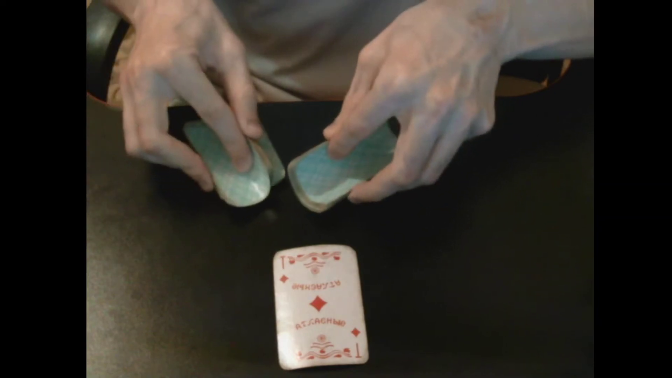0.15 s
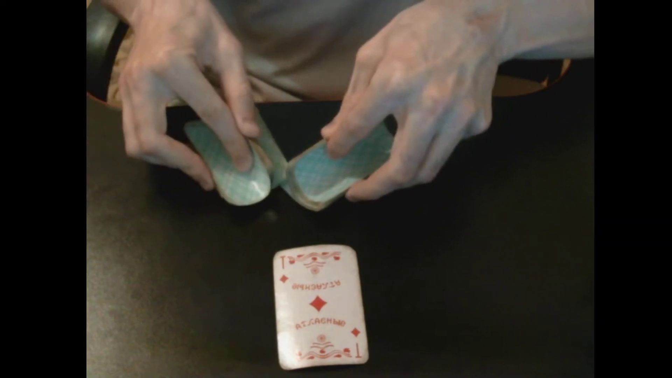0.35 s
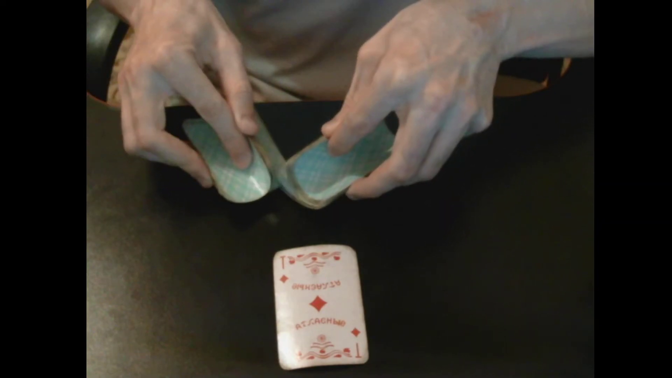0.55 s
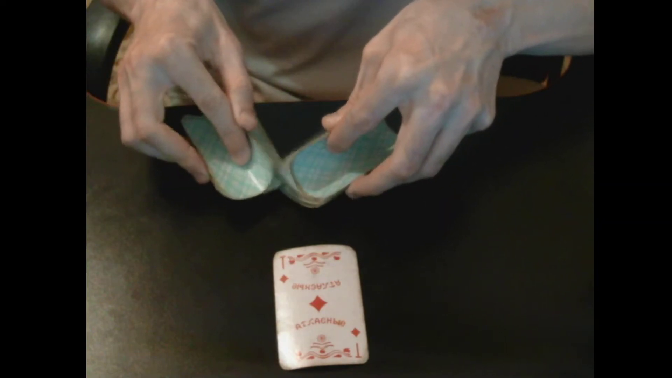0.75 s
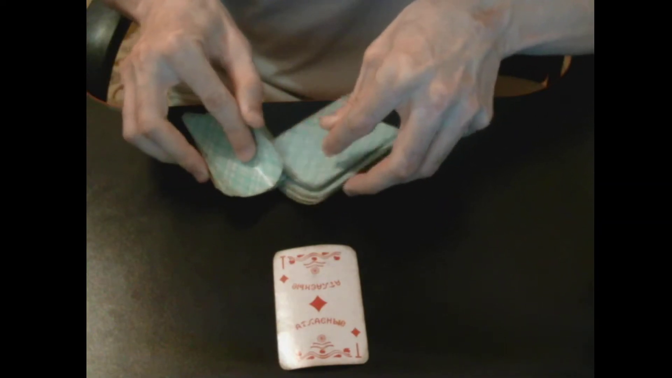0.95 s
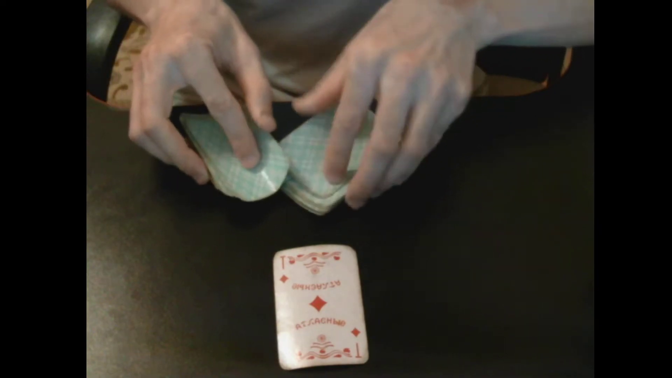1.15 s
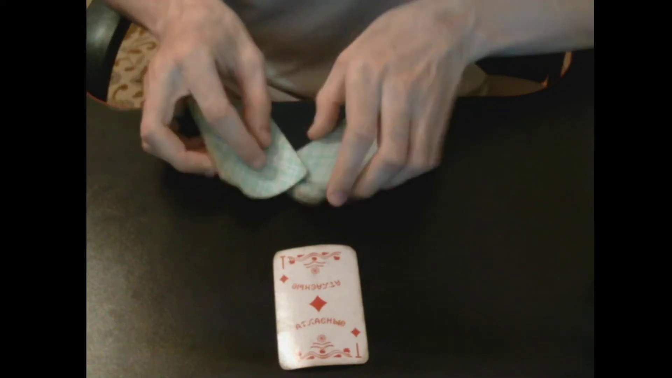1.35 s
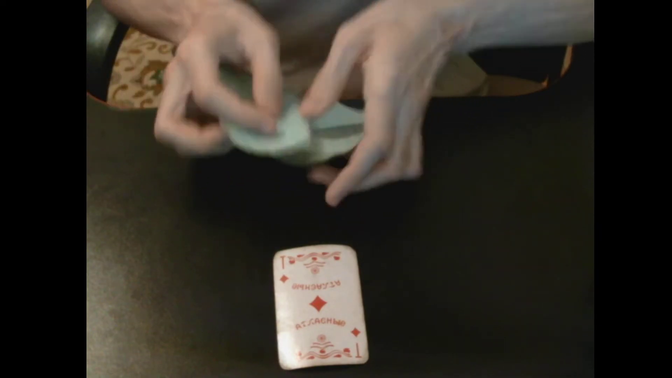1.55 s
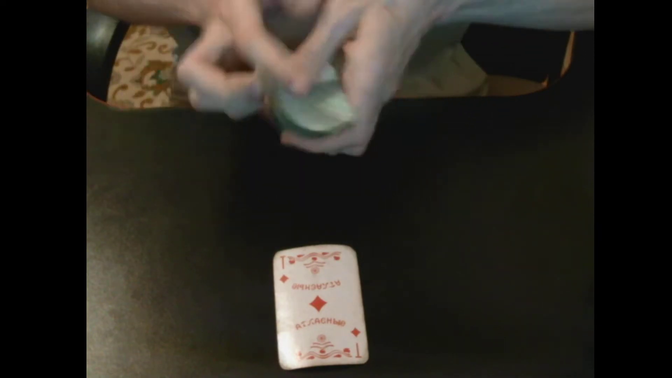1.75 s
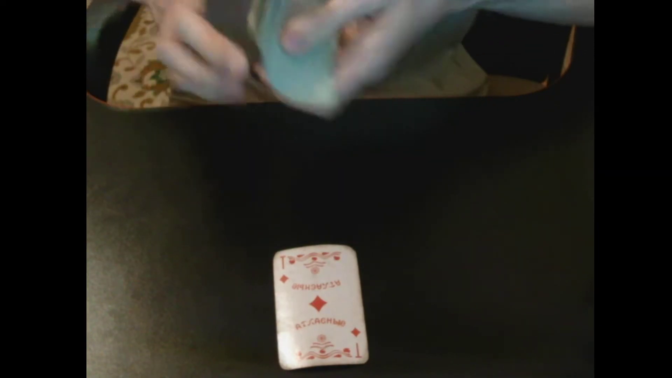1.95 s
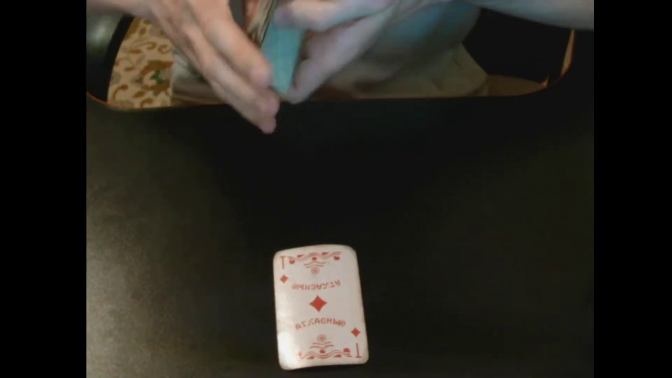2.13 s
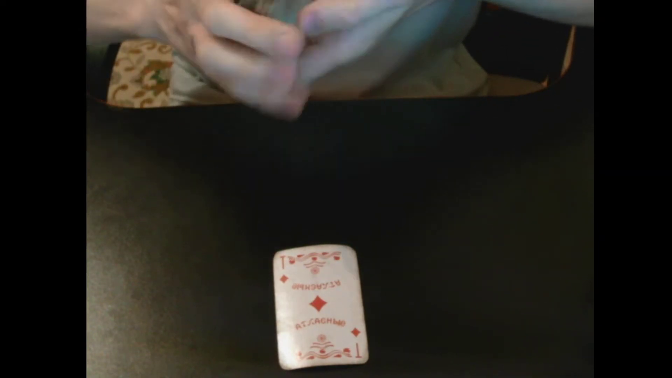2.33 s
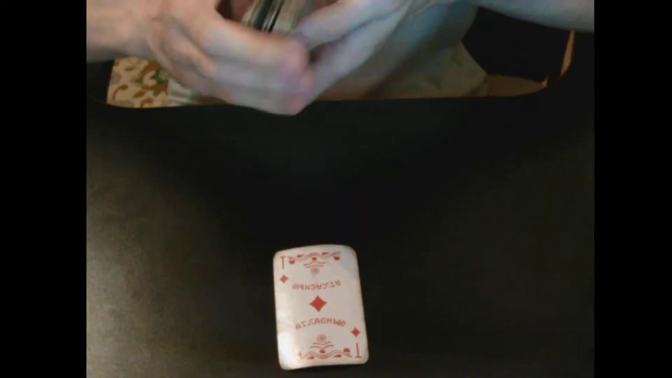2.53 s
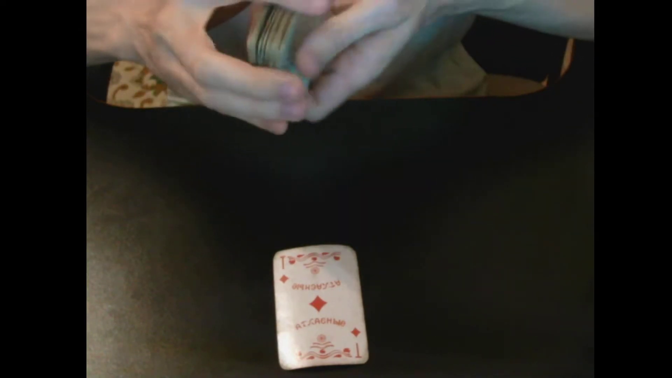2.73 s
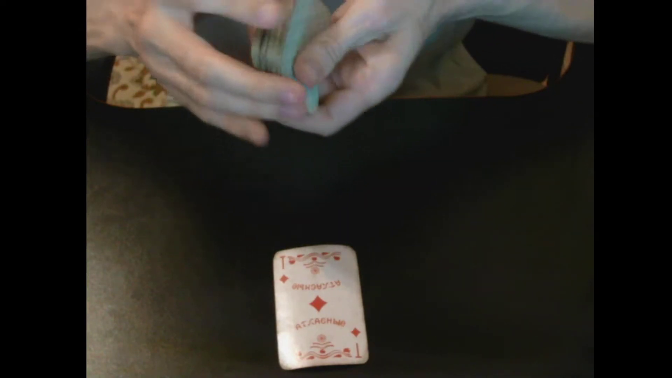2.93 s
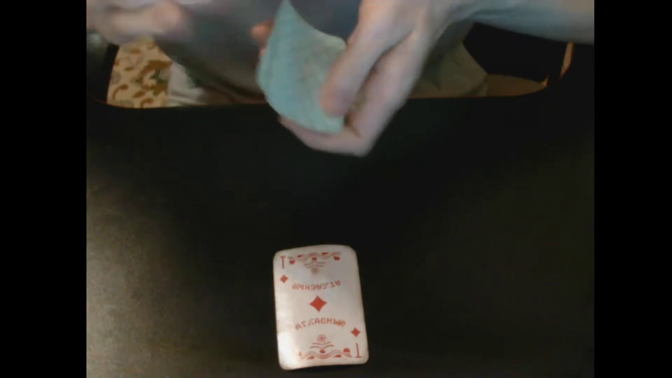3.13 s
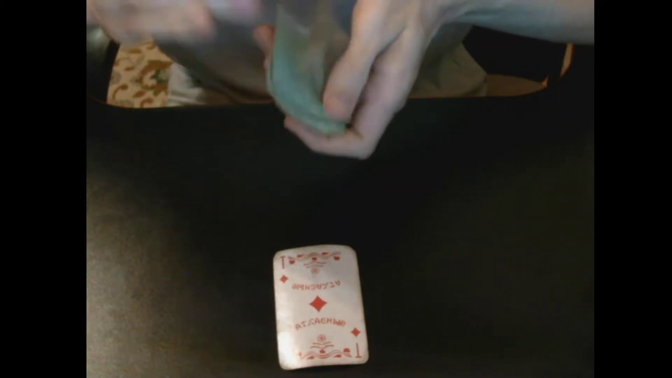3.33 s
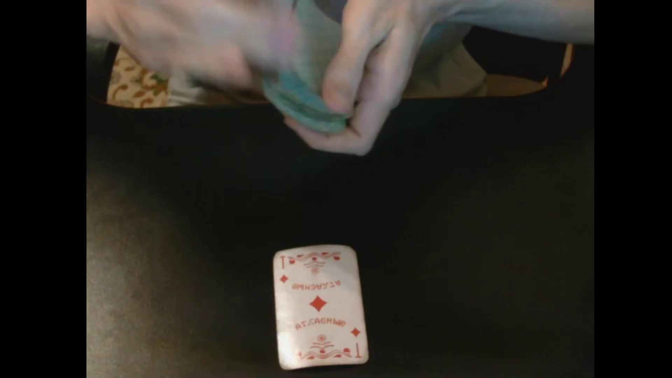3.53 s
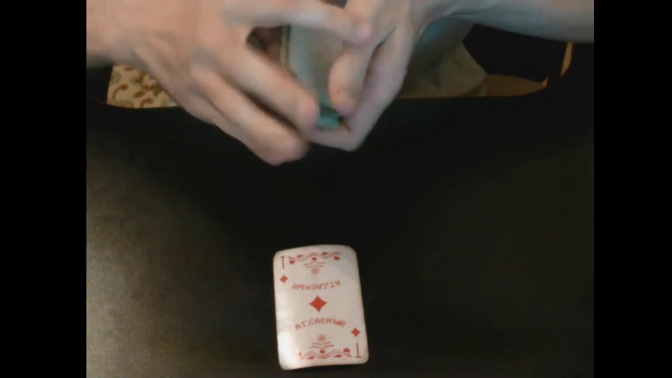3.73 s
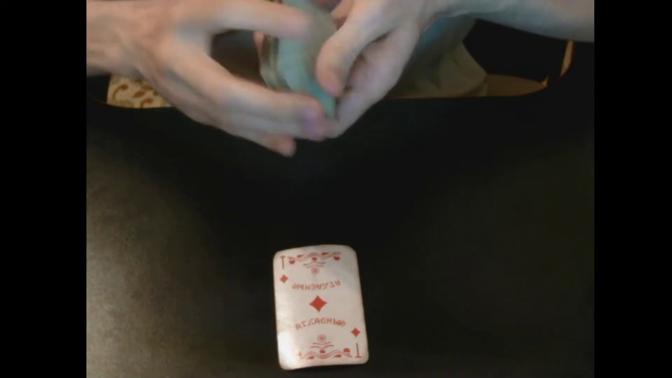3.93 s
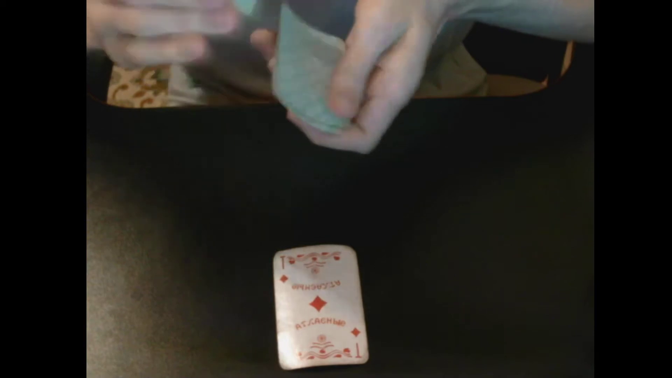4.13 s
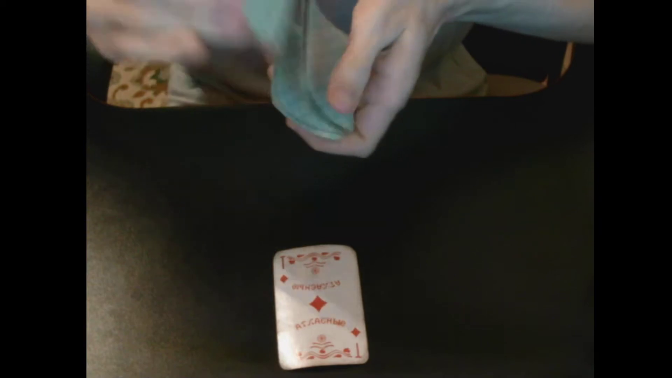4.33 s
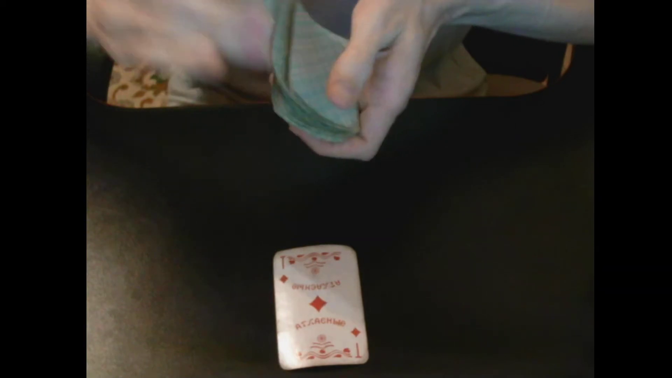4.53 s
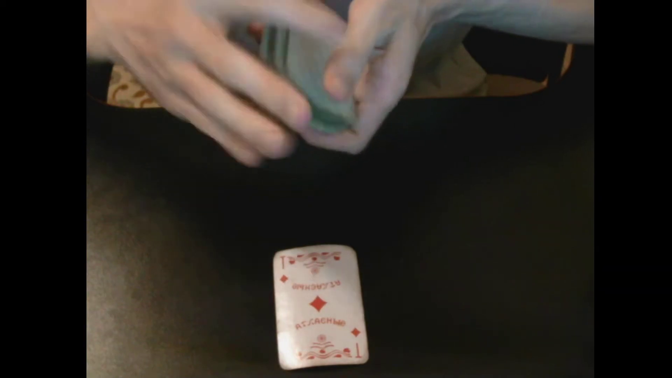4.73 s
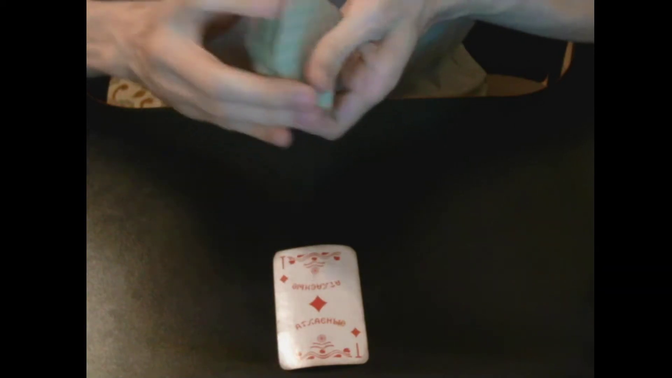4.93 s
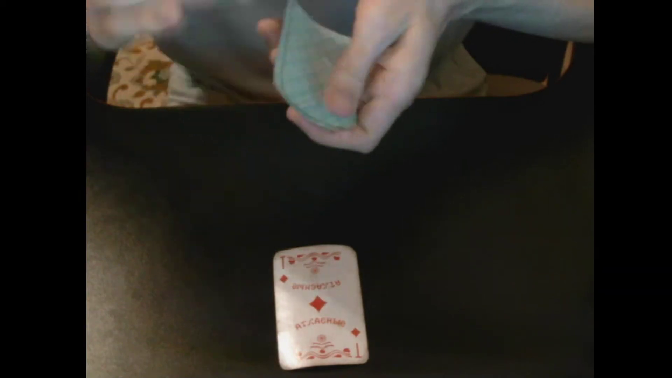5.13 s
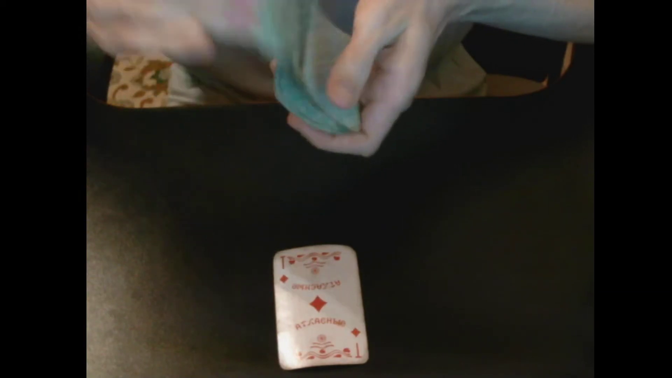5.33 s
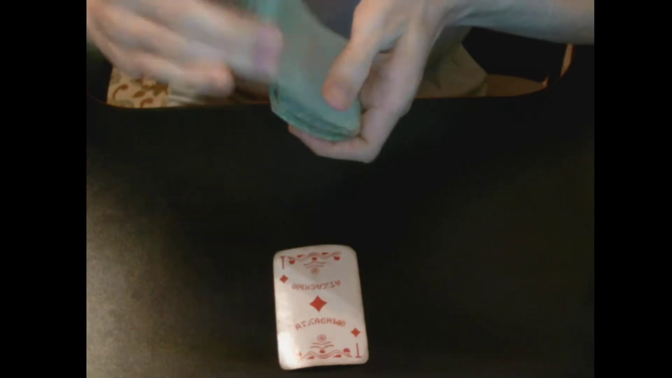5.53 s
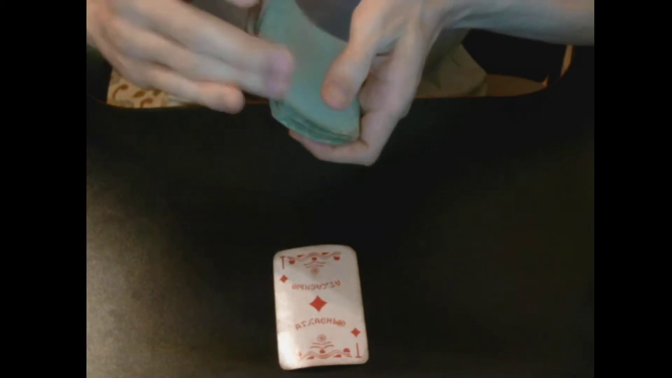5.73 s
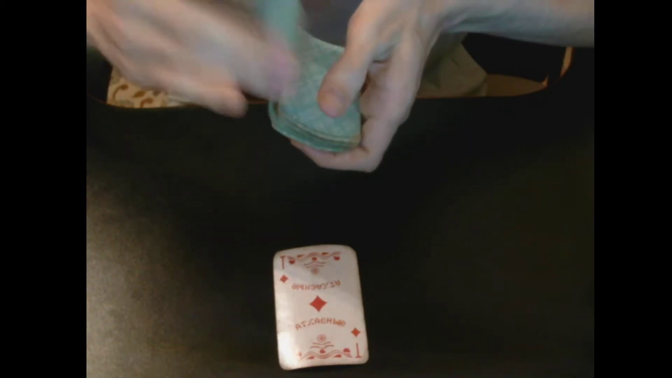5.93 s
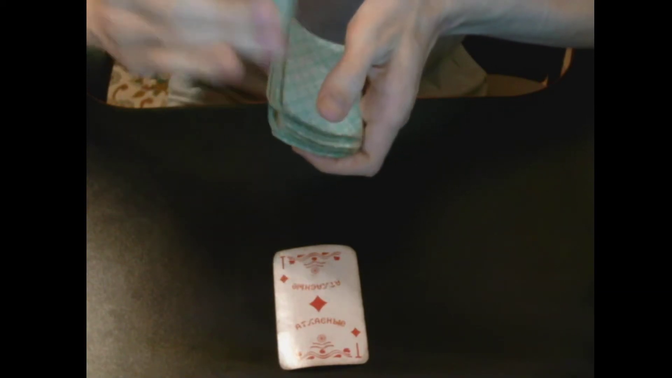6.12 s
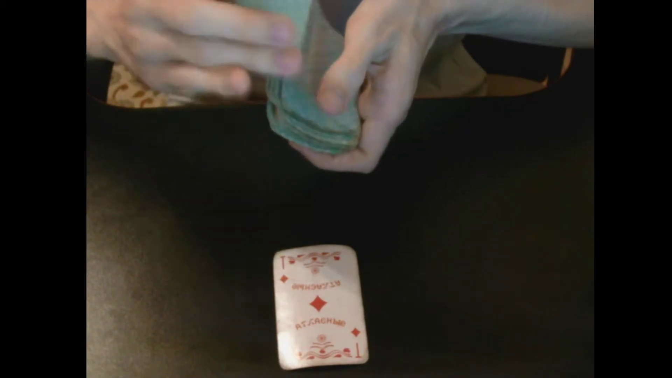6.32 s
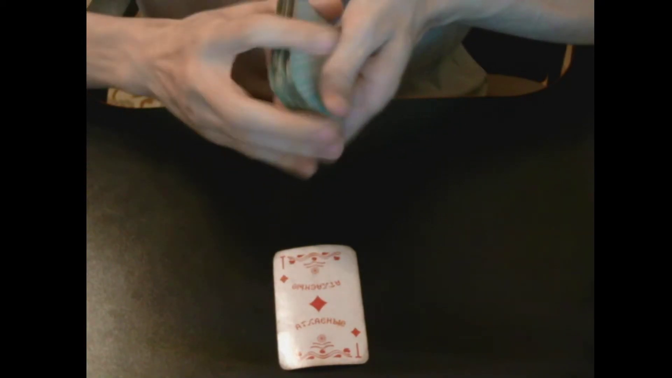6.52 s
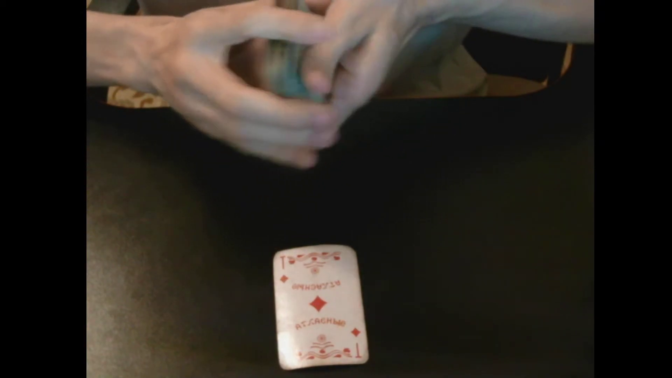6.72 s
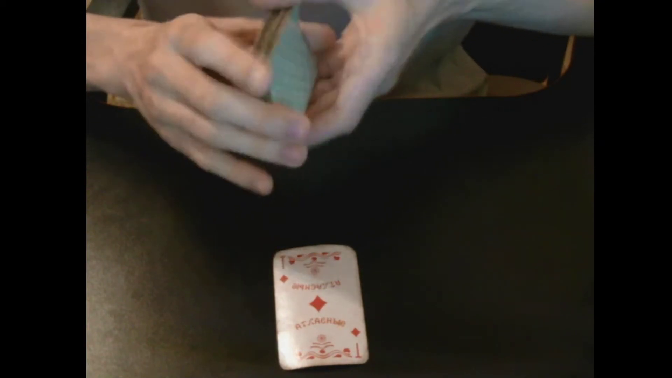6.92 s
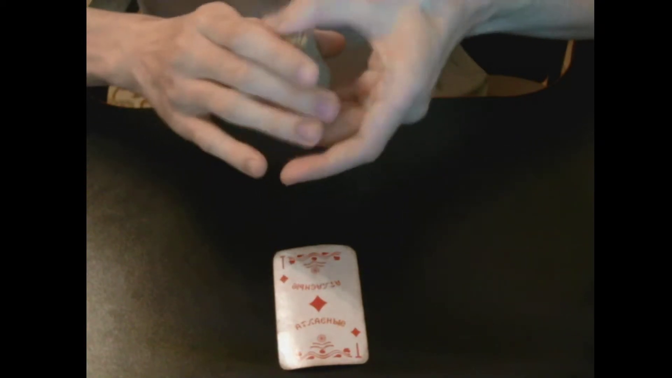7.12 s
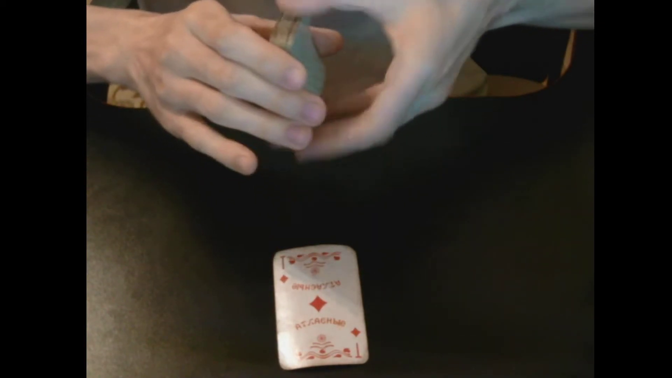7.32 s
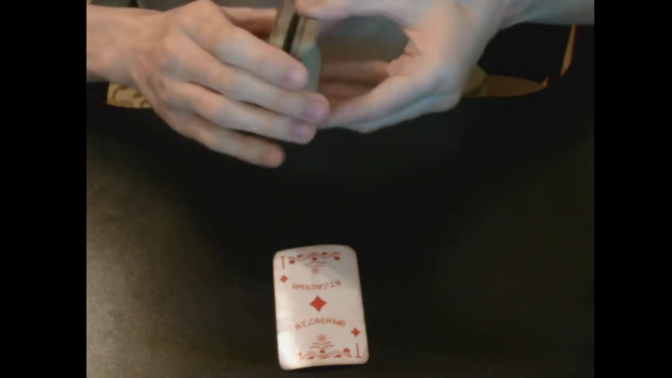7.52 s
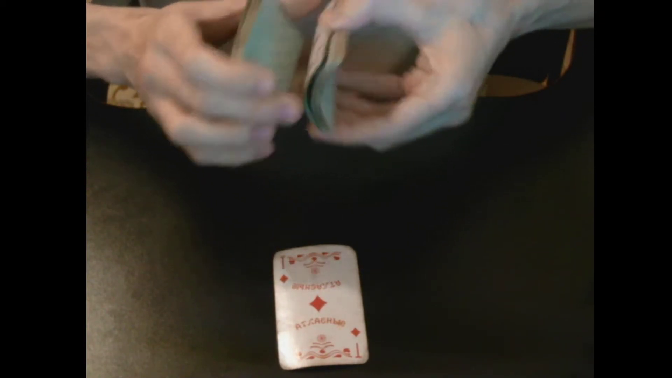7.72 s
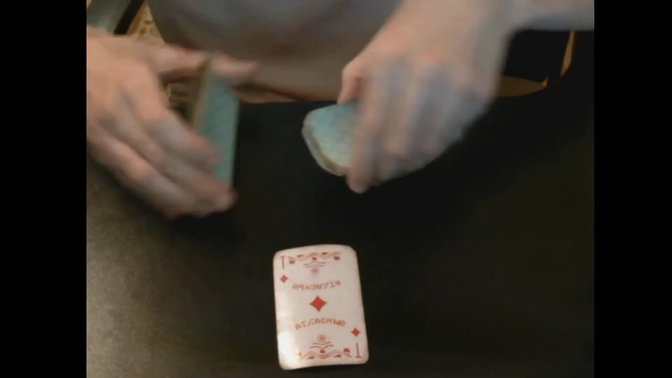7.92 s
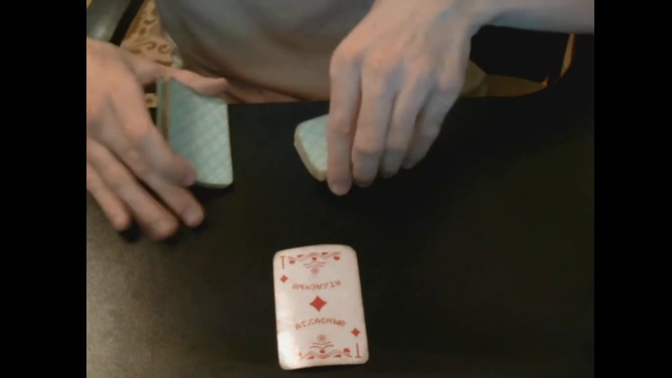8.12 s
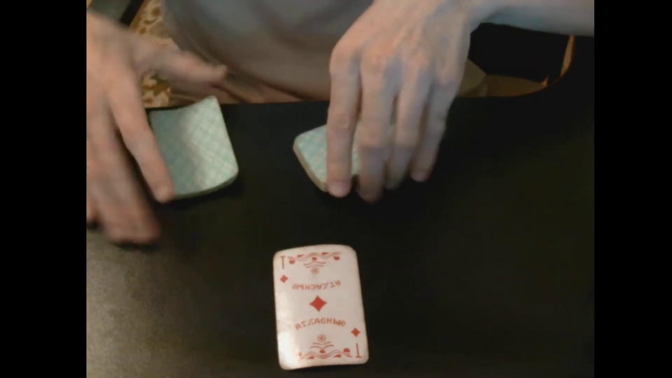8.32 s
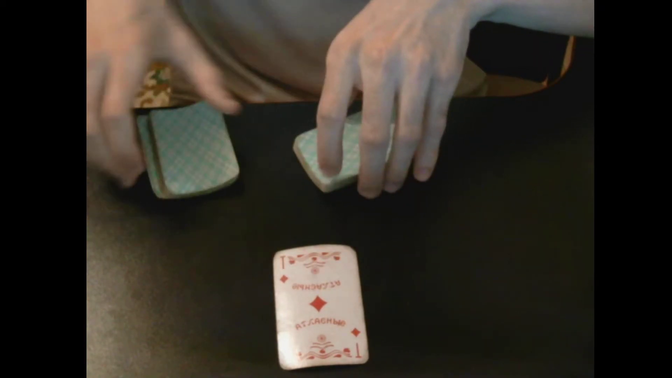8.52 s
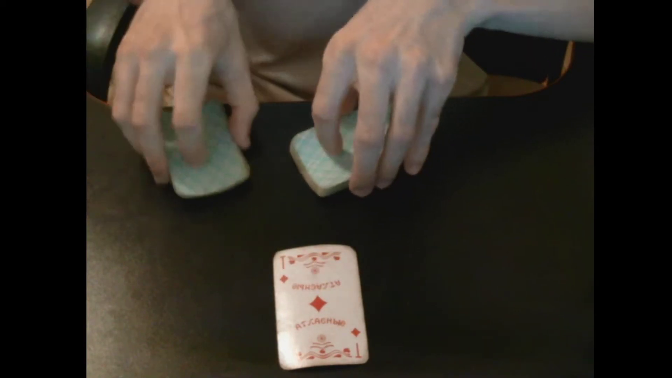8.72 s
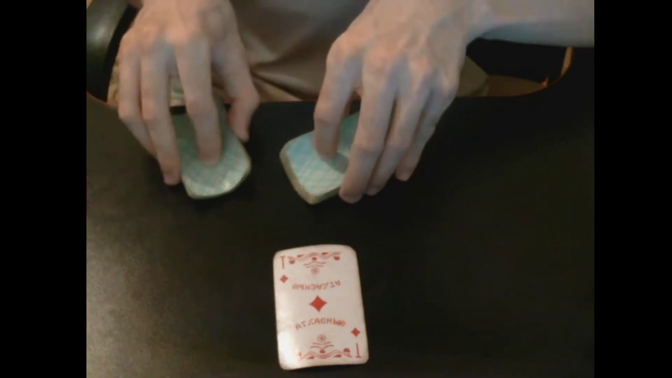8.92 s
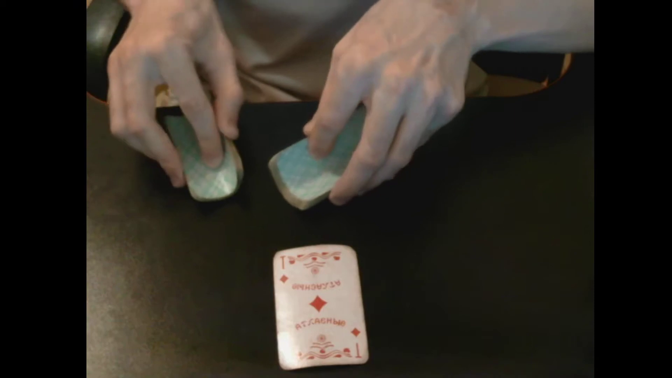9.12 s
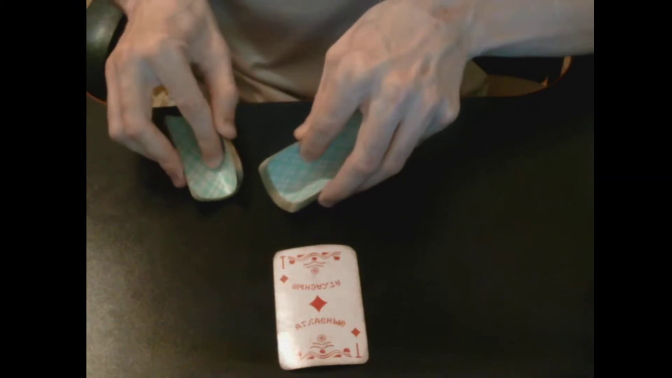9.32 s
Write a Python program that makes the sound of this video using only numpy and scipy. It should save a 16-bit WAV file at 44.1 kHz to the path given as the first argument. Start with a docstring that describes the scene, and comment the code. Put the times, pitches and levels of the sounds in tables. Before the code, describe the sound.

Close by in a small quiet room with low hum and faint hiss, cards are shuffled at a table. From 0.2 to 0.9 s, a riffle gives muffled flicks, dull brushing and soft low thumps, strongest near 0.45 and 0.6, over a deep table sway. From 1.1 to 2.5 s the cards are pushed together in longer, brighter hisses, fullest around 1.4 to 1.6, with tiny thin squeaks near 1.7 to 1.9. After a lull, overhand shuffling runs from about 2.9 to 6.4 s: short, crisp papery swishes, two to four a second, mixed with slaps and snaps, including a puffy slap at 3.2 and the sharpest crack at 3.4. Faint ticks and low rubbing continue to 6.9. Two quiet slides mark the cut near 7.5 to 7.6, then soft thuds and grainy sliding around 7.9 to 8.7 as packets are set down, fading into sparse faint ticks and room tone.

```python
"""Playing cards at a table: a deck is riffled, pushed together, shuffled overhand, cut and set down again.
Faces hiss as grainy, coloured noise; snapping edges and slapping packets are filtered cracks and chatter.
Loose edges tick at random and glossy faces squeak as thin gliding tones.
Fingers and cards thump the table as soft thuds with ringing modes; the table sways deep down as one slow
tone, arms rub as low noise, and a small quiet room adds a short tail, a low hum and hiss."""
import sys
import numpy as np
from scipy import signal
from scipy.fft import rfft, irfft
from scipy.io import wavfile
from scipy.ndimage import uniform_filter1d

SR = 44100
rng = np.random.default_rng(int(sys.argv[2]) if len(sys.argv) > 2 else 0)


def output_pcm(signal):
    """Save a mono or channel-first signal as 16-bit PCM at the path in sys.argv[1].

    Samples are clipped to [-1, 1] before scaling.
    """
    pcm = np.clip(np.atleast_2d(signal).T, -1, 1) * 32767
    wavfile.write(sys.argv[1], SR, np.round(pcm).astype(np.int16))


N = 412776
CONTROL_S = np.arange(0, N, 32) / SR  # times of the slow controls


def amp(db):
    """Gain of a level in dB."""
    return 10 ** (np.asarray(db) / 20)


def evened(x):
    """Scaled to rms 1."""
    return x / np.sqrt(np.mean(x ** 2) + 1e-20)


def unit(x):
    """Scaled to energy 1."""
    return x / np.sqrt(np.sum(x ** 2) + 1e-20)


def read(points, hz):
    """Value of a curve at hz, straight between its points on a log frequency axis."""
    point_hz, value = np.transpose(points)
    return np.interp(np.log(hz + 1), np.log(point_hz + 1), value)


def follow(rows, t, axis=1):
    """One column of a timed table, gliding from row to row."""
    rows = np.asarray(rows)
    return np.interp(t, rows[:, 0], rows[:, axis])


def add(mix, start_s, sound):
    """Lay a sound into the mix."""
    part = mix[max(round(start_s * SR), 0):][:len(sound)]
    part += sound[:len(part)]


def per_sample(control):
    return np.interp(np.arange(N) / SR, CONTROL_S, control)


def drift(rate_hz):
    """Random wandering of rms 1, mostly slower than rate_hz."""
    hz = np.fft.rfftfreq(N, 1 / SR)
    return evened(irfft(rfft(rng.standard_normal(N)) / (1 + (hz / rate_hz) ** 4), N))


def coloured_noise(colour):
    """Steady noise with a spectrum drawn by a colour table."""
    spectrum = rfft(rng.standard_normal(N))
    return irfft(spectrum * amp(read(colour, np.fft.rfftfreq(N, 1 / SR))), N)


def swell(peak_s, rise_s, fall_s, shape):
    """Gain of one movement: 20 dB down at rise_s before and fall_s after its peak; shape 1 pointed, 2 rounded."""
    t = CONTROL_S - peak_s
    away = np.maximum(-t / rise_s, t / fall_s)
    return amp(-20 * np.minimum(away ** shape, 10))


def soft_blow(hz, soft_s):
    """A low tone that swells until 2 * soft_s and fades, as from a cushioned push; envelope peak 1."""
    t = np.arange(SR // 2) / SR
    u = t / (2 * soft_s)
    return u ** 2 * np.exp(1 - u ** 2) * np.sin(2 * np.pi * hz * t)


# spectrum of the quiet room and microphone hiss: pitch_hz [Hz], level_db [dB per Hz, relative]
ROOM_TONE_COLOUR = [(50, 24.5), (80, 14.5), (115, 22.5), (160, 16), (260, 10.5), (400, 4.5), (700, -0.5),
                    (1200, -4), (1530, -0.5), (1800, -3), (5000, -4.5), (11000, -5), (15500, -6.5)]


def room_tone(level_db=-68, low_hz=450, waver_db=1.1):
    """Steady hiss over a low hum of the room that wavers slightly."""
    noise = coloured_noise(ROOM_TONE_COLOUR)
    low_share = 1 / (1 + (np.fft.rfftfreq(N, 1 / SR) / low_hz) ** 4)
    hum = irfft(rfft(noise) * low_share, N)
    hiss = noise - hum
    return amp(level_db) * evened(hum * amp(waver_db * drift(7)) + hiss)


# how long the room holds each pitch: pitch_hz [Hz], t60_s [s to fall 60 dB]
ROOM_DECAY = [(150, 0.71), (1000, 0.48), (4000, 0.24), (14000, 0.055)]


def room(x, delay_s=0.003):
    """A short tail of decaying noise, the treble dying first."""
    hz, t, z = signal.stft(rng.standard_normal(SR // 2), SR, nperseg=256)
    decay = amp(-60 * t / read(ROOM_DECAY, hz)[:, None])
    tail = signal.istft(z * decay, SR, nperseg=256)[1]
    tail = tail * (np.arange(len(tail)) > delay_s * SR)
    return signal.fftconvolve(x, unit(tail))[:N]


ARMS_LIFTED_S, LIFTED_DB = (7.66, 7.91), -19.5  # from and to; drop of the resting level meanwhile
PRESS_SHAPE, RELEASE_SHAPE = 2.66, 1.7  # a lean sets in more abruptly than it lets go
# hands leaning on the table or shifting: peak_s [s], sway_db [dB],
# rub_db [dB before the trim in handling], swell_s [s per 20 dB], fade_s [s per 20 dB]
LEANING_HANDS = [(.41, -30, -55, 0.097, 0.14), (.67, -29, -52.5, 0.23, 0.31),
                 (1.26, -40, -60.5, 0.12, 0.19), (1.47, -39, -83, .13, 0.18), (1.8, -53, -63, 0.16, 0.11),
                 (2.07, -34, -55.5, 0.099, 0.17), (2.55, -34, -64, 0.082, 0.19),
                 (2.74, -45, -79, 0.22, 0.21), (3.27, -43, -69, 0.16, 0.095),
                 (3.42, -44.5, -71, 0.095, 0.11), (3.801, -42, -88, 0.18, .17),
                 (4.08, -48, -80, 0.087, 0.13), (4.24, -47, -60, 0.13, 0.17), (4.52, -45, -78, 0.21, 0.32),
                 (4.82, -49.5, -53, 0.19, 0.092), (4.92, -46, -60.5, 0.13, .12),
                 (5.22, -43.5, -77, 0.1057, .1), (5.43, -48, -81, 0.12, 0.167),
                 (5.85, -53.5, -80, 0.21, .45), (6.44, -41.5, -59, 0.13, .15), (6.86, -41, -62, .22, .3),
                 (7.28, -55, -75, 0.065, 0.074), (7.501, -50.5, -71.5, 0.19, 0.2204),
                 (7.99, -39, -56, 0.085, 0.25), (8.29, -37, -56.5, 0.07, 0.21),
                 (8.72, -39, -74, 0.14, 0.19), (9.26, -52, -81, 0.12, 0.066)]


def leaning(resting_db, axis):
    """Level that the arms give: a little while they rest, a swell for each lean; axis picks the level column."""
    lifted = (CONTROL_S > ARMS_LIFTED_S[0]) & (CONTROL_S < ARMS_LIFTED_S[1])
    power = amp(resting_db + LIFTED_DB * uniform_filter1d(1. * lifted, size=60)) ** 2
    for row in LEANING_HANDS:
        peak_s, swell_s, fade_s = row[0], row[-2], row[-1]
        shape = np.where(CONTROL_S < peak_s, PRESS_SHAPE, RELEASE_SHAPE)
        power = power + (amp(row[axis]) * swell(peak_s, swell_s, fade_s, shape)) ** 2
    return per_sample(np.sqrt(power))


def sway(mode_hz=33.6, wander=0.0366, still_wander=0.403, nudge_db=-55, fidget_db=6):
    """The table's lowest mode: steadier when it swings widely, pushed out of step by nudges when nearly still."""
    level = leaning(resting_db=-59, axis=1)
    still = 1 / (1 + (level / amp(nudge_db)) ** 2)  # near 1 when the sway is smaller than the nudges
    pitch_hz = mode_hz * (1 + (wander + still_wander * still) * drift(11))
    fidget = amp(fidget_db * still * np.tanh(drift(7.9)))
    return np.sqrt(2) * level * fidget * np.sin(2 * np.pi * np.cumsum(pitch_hz) / SR)


# spectrum of the rubbing: pitch_hz [Hz], level_db [dB per Hz, relative]
RUB_COLOUR = [(25, -5), (50, 3), (78, 5.5), (110, -3.5), (180, -13.5), (260, -22.5), (400, -27), (700, -42),
              (2000, -44)]


def handling(trim_db=-1, lumpy_db=1.5):
    """Low, lumpy rubbing of hands and forearms, as noise that follows the leaning."""
    lumps = amp(trim_db + lumpy_db * drift(14))
    return evened(coloured_noise(RUB_COLOUR)) * leaning(resting_db=-77.5, axis=2) * lumps


# modes of the table top, the first two heavily damped by the hands:
# pitch_hz [Hz], level_db [dB, relative], t60_s [s to fall 60 dB]
TOP_MODES = [(144, -13, 0.085), (180, -25, 0.047), (260, 2.5, 0.34), (339, -9.5, 0.19), (477, -2, 0.1),
             (605, -9, 0.14)]
# fingers and cards landing on the table: start_s [s], level_db [dB before trim],
# ring_db [dB, ring of the top against the thud]
TABLE_THUMPS = [(.194, -54, -13), (.297, -47, -19.5), (.441, -37, -22), (.489, -42, -20),
                (.553, -45.5, -16.5), (0.611, -33, -21.5), (0.653, -54, -25), (.696, -48, -19),
                (.801, -60, -21), (0.847, -50, -21), (.903, -65, -22), (1.226, -51, -18),
                (1.285, -55.5, -13.5), (1.988, -57.5, -28), (2.031, -53, -35), (2.605, -55, -29),
                (2.655, -57, -23), (6.822, -52, -21.5), (6.865, -69, -20), (7.537, -62.5, -15),
                (7.912, -48.5, -11), (7.973, -54, -11), (8.017, -45.5, -11.5), (8.053, -48, -27),
                (8.198, -57.5, -18), (8.445, -60, -20), (8.547, -52.5, -18), (8.614, -50.5, -19.5),
                (8.723, -57, -22.5)]


def thumps(trim_db=0.7, thud_hz=151, soft_s=0.0092):
    """A dull thud under the fingers, and the table top ringing on after it in decaying modes."""
    t, out = np.arange(SR // 2) / SR, np.zeros(N)
    ring = sum(amp(db - 60 * t / t60_s) * np.sin(2 * np.pi * hz * t) for hz, db, t60_s in TOP_MODES)
    ring *= 1 - np.exp(-t / soft_s)  # soft onset
    for start_s, level_db, ring_db in TABLE_THUMPS:
        thud = soft_blow(thud_hz * rng.uniform(.97, 1.03), soft_s)
        add(out, start_s, amp(level_db + trim_db) * (thud + amp(ring_db) * ring))
    return out


# glossy faces squeaking faintly as the deck closes, one list a squeak:
# time_s [s], pitch_hz [Hz], level_db [dB peak]
FACE_SQUEAKS = [
    [(1.66, 3900, -84), (1.71, 4400, -73), (1.755, 4500, -75), (1.79, 4100, -89), (1.805, 4020, -90)],
    [(1.80, 7350, -93), (1.84, 7200, -91), (1.88, 7100, -71), (1.905, 6940, -95)],
]


def squeaks(unsteady=0.012):
    """Stick and slip fast enough to make a thin, gliding tone."""
    t, out = np.arange(N) / SR, np.zeros(N)
    for rows in FACE_SQUEAKS:
        pitch_hz = follow(rows, t) * (1 + unsteady * drift(200))
        sounding = (t > rows[0][0]) * (t < rows[-1][0])
        level = amp(follow(rows, t, axis=2))
        out += sounding * level * np.sin(2 * np.pi * np.cumsum(pitch_hz) / SR)
    return out


def octaves(hz):
    """Distance in octaves from the middle of the cards' range, the pivot of brightness."""
    return np.log2(np.clip(hz, 500, 11500) / 4000)


def causal(db):
    """Sharp-fronted (minimum-phase) impulse response with the given spectrum."""
    log_gain = np.log(amp(np.r_[db, db[-2:0:-1]]))
    return np.fft.ifft(np.exp(np.conj(signal.hilbert(log_gain)))).real[:len(db)]


# spectrum of a struck card: pitch_hz [Hz], level_db [dB per Hz, relative]
CARD_COLOUR = [(120, 0.5), (300, -11), (520, -8), (740, -11), (1000, -5), (1200, -8), (1600, -1),
               (2300, -6), (2900, -1), (4300, 0.5), (7000, -2), (10500, -4), (13000, -12), (15500, -13)]


def strike(level_db, tilt, ring_hz, ring_db, crack, settle_s, ring_width, chatter_db, bounce=0.27):
    """A crack echoes inside the packet, cards chatter to rest; the bent card colours both at its own pitch."""
    t, hz = np.arange(4096) / SR, np.fft.rfftfreq(2048, 1 / SR)
    spikes = np.minimum(rng.exponential(1, len(t)), 4)
    chatter = rng.standard_normal(len(t)) * amp(chatter_db * spikes)
    crack = np.clip(crack, .02, .97)  # share of the energy of the force
    force = np.sqrt(1 - crack) * unit(chatter * np.exp(-t / settle_s) * (t > 0))
    force[0] = np.sqrt(crack)
    # waves returning from the card's edges ripple its spectrum
    returns_s = rng.uniform(.0003, .0012, (3, 1))
    echoes = abs(1 - bounce * np.exp(-2j * np.pi * hz * returns_s))
    ripple_db = 20 * np.log10(echoes).sum(0)
    # raises or, if negative, lowers the band around ring_hz; width as a fraction of it
    resonance_db = ring_db / (1 + ((hz / ring_hz - 1) / ring_width) ** 2)
    spectrum_db = read(CARD_COLOUR, hz) + tilt * octaves(hz) + resonance_db + crack * ripple_db
    sound = signal.fftconvolve(force, causal(spectrum_db))
    return amp(level_db) * unit(sound) * np.sqrt(.005 * SR)  # level is the rms if spread over 5 ms


# stretches of random ticking: from_s [s], to_s [s], rate [ticks a second],
# level_db [dB, middle of the spread]
LOOSE_EDGES = [(.46, 0.795, 24, -70.5), (6.361, 6.521, 30, -68), (6.618, 6.719, 20, -69),
               (8.84, 8.981, 14, -74)]


def ticks(tilt=-1.5, ring_hz=1800, spread_db=4):
    """Loose edges tick faintly between the clear snaps, each at a random place in its share of the stretch."""
    out = np.zeros(N)
    for from_s, to_s, rate, level_db in LOOSE_EDGES:
        count = max(round((to_s - from_s) * rate), 1)
        for k, (place, size, bright, pitch) in enumerate(rng.uniform(-1, 1, (count, 4))):
            start_s = from_s + (to_s - from_s) * (k + .5 + .5 * place) / count
            tick = strike(level_db + spread_db * size, tilt + 2 * bright, ring_hz * 2 ** (.5 * pitch),
                          ring_db=3, crack=0.18, settle_s=0.0062, ring_width=0.4, chatter_db=11.0)
            add(out, start_s, tick)
    return out


# packets landing on the pile: start_s [s], level_db [dB], tilt [dB per octave], ring_hz [Hz],
# ring_db [dB], settle_s [s, time constant], push_db [dB, air in the palm]
PACKET_SLAPS = [(3.1773, -36.5, -3.5, 1250, 10, 0.0053, -46), (3.6206, -46.5, -1, 2020, 17, 0.0064, -62),
                (4.1757, -46.5, -3.5, 1770, 4.5, 0.0079, -61), (4.4105, -51, -2.5, 3420, 5, 0.0081, -69),
                (4.6359, -43, -0.5, 1800, 8, 0.0025, -68), (5.1859, -51, -4.5, 7780, 2, 0.015, -56),
                (5.9015, -49, -4, 1680, 1, 0.0035, -60.5), (6.158, -49.5, -3.5, 1830, 12, 0.014, -63)]


def slaps(palm_hz=112, push_s=0.0026):
    """Each packet cracks on the pile and pushes a puff of air out of the cupped hand."""
    out = np.zeros(N)
    for start_s, level_db, tilt, ring_hz, ring_db, settle_s, push_db in PACKET_SLAPS:
        slap = strike(level_db, tilt, ring_hz, ring_db, crack=0.12, settle_s=settle_s,
                      ring_width=0.21, chatter_db=7.0)
        add(out, start_s, slap)
        add(out, start_s, amp(push_db) * soft_blow(palm_hz, push_s))
    return out


# card edges snapping: start_s [s], level_db [dB], tilt [dB per octave], ring_hz [Hz], ring_db [dB],
# crack [share of the first crack 0-1, held within .02-.97]
EDGE_SNAPS = [(.187, -65, 6, 8450, -3, 0.1), (.1991, -64, -3, 1880, 5, .5), (.293, -65, 2, 1240, 14, 0.3),
              (0.3019, -58, -8, 1250, 10, 0.24), (.4235, -63, 1, 1250, 12, .3),
              (0.439, -56, -7.5, 4990, 7, .35), (0.4503, -57, -12.5, 2000, 7, 0.5),
              (0.4933, -50, -9.5, 1300, 10, 0.4), (.5394, -66, -4, 2000, 5, .5),
              (0.5557, -49, -7.5, 1980, 8.5, 0.76), (.5775, -60, -8, 2000, 6, .4),
              (0.5976, -62, -4, 1420, 6, 0.2), (.6082, -56.5, -5, 2270, 1, 0.4),
              (.683, -61, -4, 1250, 2, 0.2), (.6882, -58, -3, 4660, 6, 0.5),
              (.7026, -46.5, -5, 1200, 5.5, 0.72), (0.7793, -64, 2, 2140, 15, 0.12),
              (.8135, -55, -2, 2180, 7, 0.4), (.8373, -58.5, 0, 2920, 32, .6),
              (.8452, -56, 1, 2070, -3, 0.86), (.911, -62, -7, 2020, 10, .4),
              (1.7369, -57.5, -5, 8500, 14, 0.75), (2.9598, -52.5, -3.5, 1680, 9, 0.3),
              (2.972, -49.5, -6, 1283, -8, 0.33), (2.981, -51, -3, 4080, 3, 0.4),
              (3.1887, -43.5, -3, 6620, 5, 0.14), (3.236, -53, -0.5, 2310, 21, .6),
              (3.4293, -32, 2.5, 8000, 1.5, 1), (3.515, -55, -2.5, 4990, 2, 0.77),
              (3.6215, -40.5, -1.8, 2030, -4, 0.52), (3.6585, -57, -6, 1610, -10, 0.33),
              (3.9695, -44.5, 5, 4230, 3, 0.84), (3.972, -49, 5, 4500, 10, 0.52),
              (4.773, -59, 3, 3840, 19, .1), (4.782, -51, -7, 3700, 17, 0), (4.9645, -48, -1, 4040, 9, .03),
              (4.984, -49.5, -4.5, 3640, 7, 0.07), (5.33, -61, -1, 3250, 12, 0.66),
              (5.6002, -54, -2, 1185, 10, .7), (5.6099, -48, -4, 8100, 10, 0.9),
              (5.666, -63, -1, 8100, 4, 0.62), (5.9025, -57, 2, 1270, -9, 0.7),
              (5.9569, -45.5, -2.3, 3480, 14, 1), (6.142, -59, 9, 3800, 17, 0.24),
              (6.3289, -54.5, 6, 1760, 19.5, 0.4), (6.3793, -59.5, -2, 1402, 14, .3),
              (6.4358, -61.5, -5, 1265, 10, 0.5), (6.851, -59.5, 6.5, 8100, 6, 0.4),
              (7.0322, -61.5, 3.5, 1263, 11, 0.2), (7.918, -57.5, -5.5, 1260, 5, 0.81),
              (8.0252, -65, -9, 702.6, 9, 0.45), (8.1663, -66.5, -2.3, 1724, 23, .3)]


def snaps():
    """Single card edges let go with a crack and a very short chatter."""
    out = np.zeros(N)
    for start_s, level_db, tilt, ring_hz, ring_db, crack in EDGE_SNAPS:
        snap = strike(level_db, tilt, ring_hz, ring_db, crack, settle_s=0.0044, ring_width=0.25, chatter_db=1.5)
        add(out, start_s, snap)
    return out


# a stroke starts bright on the edges and dulls as the faces meet: tilt swings by +/- this many dB per octave
DULLING, DULLING_S = 0.95, 0.024


def slide(strokes, colour, trim_db, grit_db, judder_db, patchy_db, shape):
    """Tiny catches of card on card, juddering with the grip and coloured by shifting card resonances."""
    power = np.array([(amp(level_db) * swell(peak_s, swell_s, fade_s, shape)) ** 2
                      for peak_s, level_db, swell_s, fade_s, _ in strokes])
    tilts = np.array([tilt - DULLING * np.tanh((CONTROL_S - peak_s) / DULLING_S)
                      for peak_s, *_, tilt in strokes])
    tilt = (tilts * power).sum(0) / power.sum(0)  # the loudest stroke decides the brightness
    catches = rng.standard_normal(N) * amp(grit_db * np.minimum(rng.exponential(1, N), 5))
    hz, at_s, z = signal.stft(evened(catches), SR, nperseg=512, noverlap=384)
    # resonances that come and go: chance smoothed over pitch, then over time
    patches = uniform_filter1d(rng.standard_normal(z.shape), size=5, axis=0)
    patches = evened(uniform_filter1d(patches, size=12, axis=1))
    brightness_db = octaves(hz)[:, None] * np.interp(at_s, CONTROL_S, tilt)
    gain = amp(read(colour, hz)[:, None] + brightness_db + patchy_db * patches)
    gain /= np.sqrt(np.mean(gain ** 2, axis=0))  # colour alone, the strokes set the level
    hiss = signal.istft(z * gain, SR, nperseg=512, noverlap=384)[1][:N]
    return hiss * per_sample(np.sqrt(power.sum(0))) * amp(trim_db + judder_db * drift(83))


# strokes of card over card, here and in the four gestures below: peak_s [s, fastest],
# level_db [dB before trim], swell_s, fade_s [s per 20 dB], tilt [dB per octave at the peak]
RIFFLE_STROKES = [(.305, -70.5, 0.021, 0.058, -0.5), (.446, -62, 0.0089, 0.04, -3),
                  (.5, -60.5, 0.017, .04, -4.5), (.6, -64, 0.079, 0.046, -5), (.707, -65, .005, 0.06, -4.5),
                  (.82, -64, 0.054, 0.053, -1), (.97, -74.5, 0.15, 0.072, 2)]
# spectrum of a gesture, here and below: pitch_hz [Hz], level_db [dB per Hz, relative]
RIFFLE_SPECTRUM = [(200, -3), (480, -11), (720, 0), (1000, -9), (1450, -16), (2000, 7), (2400, -14),
                   (3000, -8), (4500, -3), (7000, -3.5), (11000, -10), (15500, -16)]


def riffle():
    """The cards brush past each other in short, mostly dull strokes with strong shifting resonances."""
    return slide(RIFFLE_STROKES, RIFFLE_SPECTRUM, trim_db=1.5, grit_db=3, judder_db=3.0, patchy_db=5, shape=1.0)


# strokes and spectrum of the deck pushed together, columns as for the riffle
SQUARE_STROKES = [(1.17, -70.5, 0.11, 0.14, 3), (1.305, -63.5, 0.097, 0.15, -5),
                  (1.365, -59.5, 0.1, 0.092, 3), (1.425, -56.5, 0.064, 0.039, 2),
                  (1.607, -55.5, 0.18, 0.17, 3), (1.95, -67.5, 0.17, 0.43, 7),
                  (2.175, -66.5, 0.24, 0.11, 5.5), (2.3, -62, 0.073, 0.1, 3),
                  (2.39, -60, 0.039, 0.031, 7.5), (2.478, -65.5, 0.016, .035, 8.5),
                  (2.53, -76, 0.047, .3, 2)]
SQUARE_SPECTRUM = [(200, -12), (480, 0.5), (720, -7.5), (1000, 0), (1250, -7), (1550, -2), (2300, -3),
                   (2800, -1), (4000, 0), (6000, -5.5), (9000, -9), (12000, -12.5), (15500, -24)]


def push_together():
    """The faces slide into one deck with longer, mostly bright hisses."""
    return slide(SQUARE_STROKES, SQUARE_SPECTRUM, trim_db=-1.5, grit_db=3, judder_db=1.7, patchy_db=0.5, shape=0.93)


# strokes and spectrum of the cut, columns as for the riffle
CUT_STROKES = [(7.508, -60, 0.048, 0.065, -1.1), (7.597, -61, 0.021, 0.057, 0.53)]
CUT_SPECTRUM = [(400, -22), (1150, -33), (1550, -14), (2200, -11), (2800, 0), (3200, 0.5), (3900, -6.5),
                (4800, 2), (5400, -6), (6400, -1), (7600, -15), (11000, -14.5), (15500, -30)]


def cut():
    """One part of the deck slides off the other in two quiet, rounded strokes."""
    return slide(CUT_STROKES, CUT_SPECTRUM, trim_db=-0.4, grit_db=1.5, judder_db=2.5, patchy_db=-1.0, shape=1.74)


# strokes and spectrum of the cards set down on the table, columns as for the riffle
TABLE_STROKES = [(7.922, -60.5, 0.0039, 0.057, -4.5), (8.03, -64.5, 0.12, 0.12, -5.5),
                 (8.167, -71.5, .06, 0.1, 0.5), (8.58, -67, 0.049, 0.076, 0.5),
                 (8.865, -73, 0.061, 0.22, -0.5)]
TABLE_SPECTRUM = [(250, 10.5), (450, -2), (750, -2.5), (1500, -3), (2300, -1.5), (3000, 3.5), (4300, -1.5),
                  (5600, 0), (8000, -4.5), (11000, -3), (15500, -20)]


def set_down():
    """The deck slides quietly on the table, with a grainy hiss."""
    return slide(TABLE_STROKES, TABLE_SPECTRUM, trim_db=3.0, grit_db=4.0, judder_db=1.5, patchy_db=0.5, shape=1.22)


# strokes and spectrum of the overhand shuffle, columns as for the riffle
OVERHAND_STROKES = [(2.948, -49.5, .085, 0.028, .5), (3.186, -52.5, 0.033, 0.075, -2),
                    (3.434, -60, 0.051, 0.11, -2), (3.626, -51.5, 0.0046, 0.049, -3),
                    (3.72, -70, 0.1, 0.21, -3), (3.968, -50.5, 0.071, 0.041, 0),
                    (4.18, -52, 0.033, .045, 0.5), (4.232, -57.5, 0.027, 0.014, -1),
                    (4.425, -50.5, 0.04, 0.06, 0), (4.64, -48, .004, 0.042, -3),
                    (4.785, -58, 0.026, .02, -6), (4.958, -49.5, 0.071, 0.053, 0.5),
                    (5.197, -50, 0.051, 0.085, 1), (5.48, -54.5, 0.06, 0.038, 1),
                    (5.608, -53, 0.0094, 0.066, -0.5), (5.925, -48.5, 0.048, 0.036, -0.5),
                    (6.16, -59.5, 0.034, 0.046, -0.5), (6.331, -53.5, 0.0031, 0.032, 1),
                    (6.425, -61, 0.063, 0.12, -1), (6.64, -71, .025, 0.085, 1),
                    (6.847, -63.5, 0.022, 0.019, -4.5)]
OVERHAND_SPECTRUM = [(150, -15.5), (450, -6.5), (700, -12), (1000, -6), (1200, -11), (1450, -3),
                     (1900, -2.5), (2300, -4.5), (3600, 0.5), (6000, 0), (8000, -1), (11000, 2),
                     (13000, -3), (15500, -11)]


def overhand():
    """Packet after packet is drawn off the deck, the loudest hisses of all."""
    return slide(OVERHAND_STROKES, OVERHAND_SPECTRUM, trim_db=-2.0, grit_db=1.5, judder_db=2.5, patchy_db=1.0,
                 shape=1.18)


def cards():
    """The deck sliding, snapping, slapping, ticking and squeaking."""
    strokes = riffle() + push_together() + overhand() + cut() + set_down()
    return strokes + snaps() + slaps() + ticks() + squeaks()


def scene():
    """Cards and table, close by, in the room."""
    near = cards() + thumps()
    return (near + amp(-19) * room(near) + sway() + handling() + room_tone())[None]


def record(dry, edge_hz=15900):
    """The recorder's band limit: a steep low-pass."""
    low_pass = signal.firwin(511, edge_hz, window=("kaiser", 9), fs=SR)
    return signal.oaconvolve(dry, low_pass[None], "same")


dry = scene()
out = record(dry)
output_pcm(out)
```